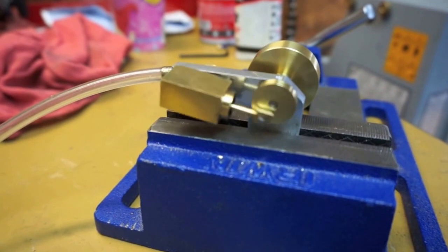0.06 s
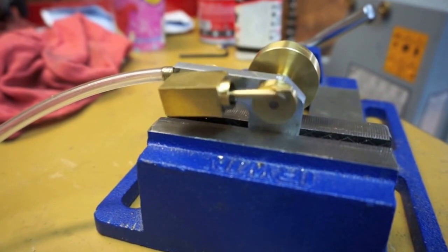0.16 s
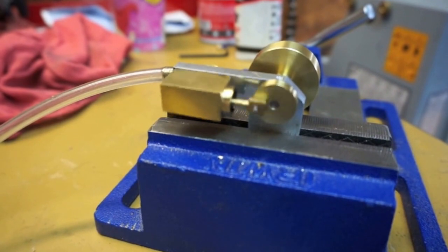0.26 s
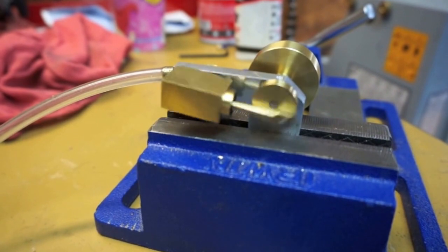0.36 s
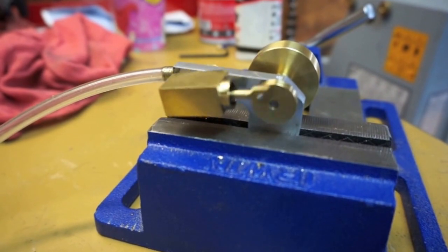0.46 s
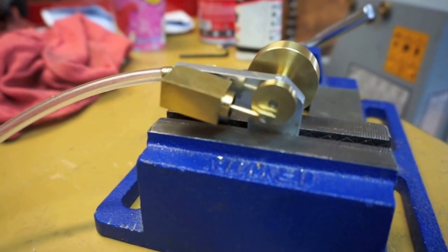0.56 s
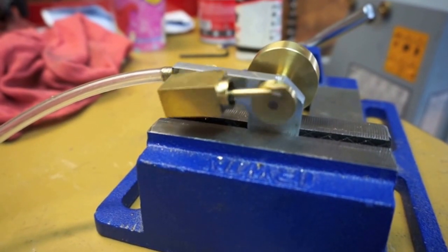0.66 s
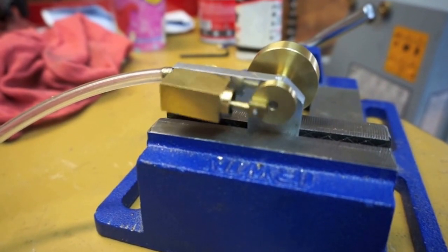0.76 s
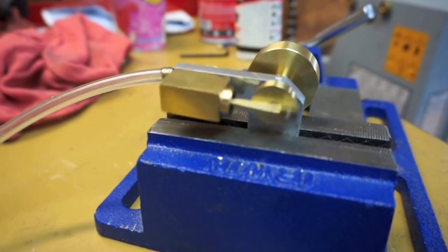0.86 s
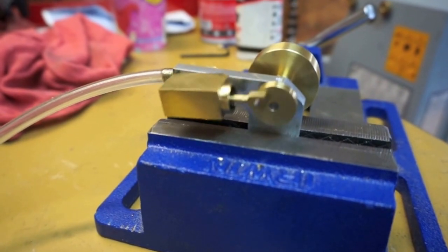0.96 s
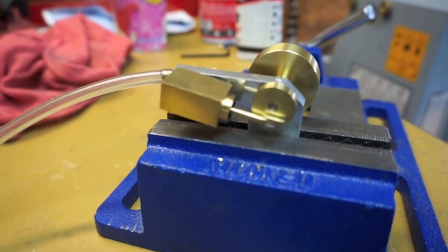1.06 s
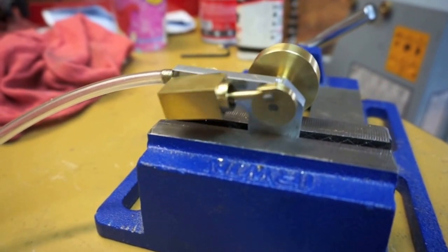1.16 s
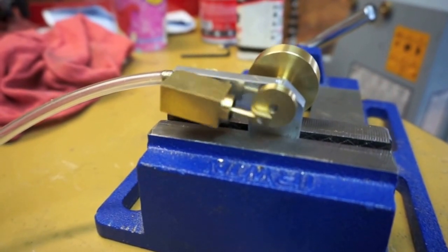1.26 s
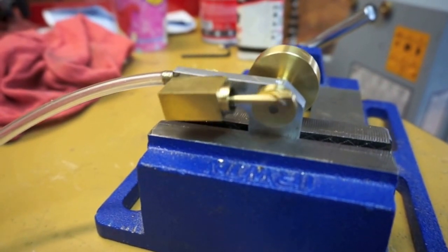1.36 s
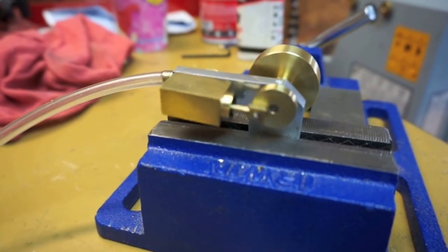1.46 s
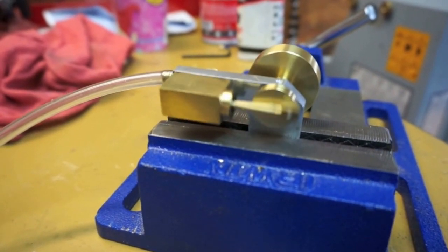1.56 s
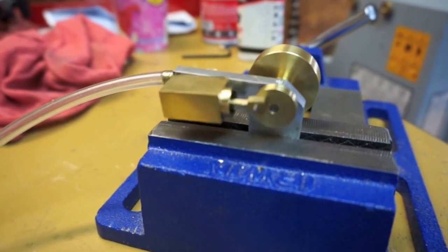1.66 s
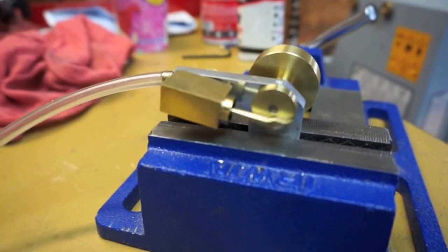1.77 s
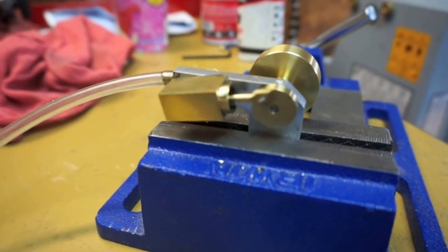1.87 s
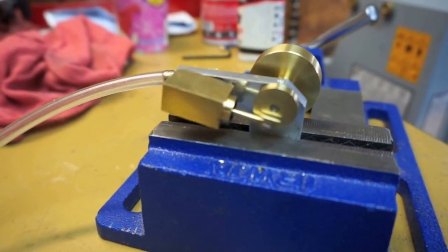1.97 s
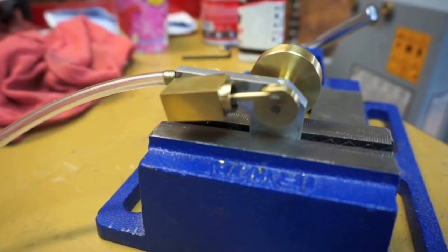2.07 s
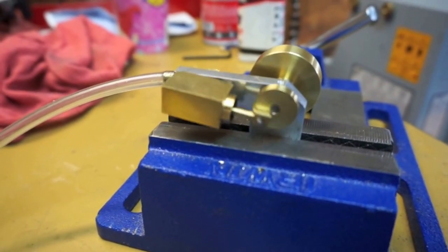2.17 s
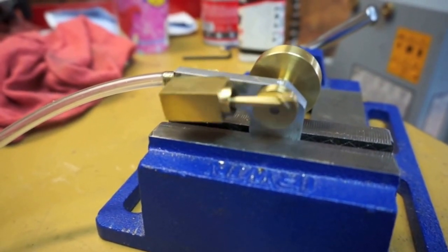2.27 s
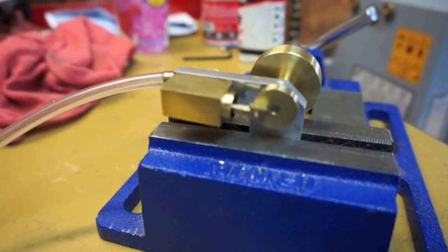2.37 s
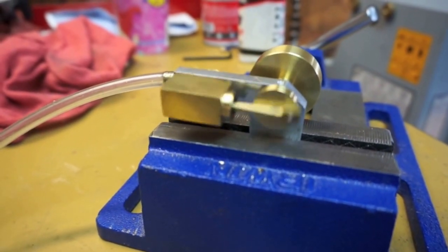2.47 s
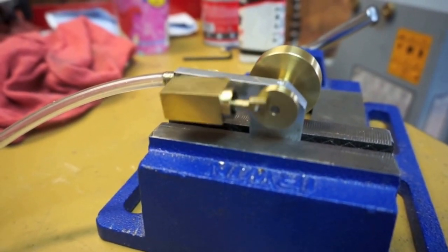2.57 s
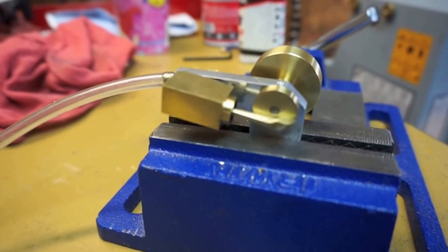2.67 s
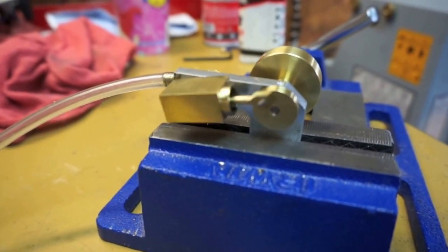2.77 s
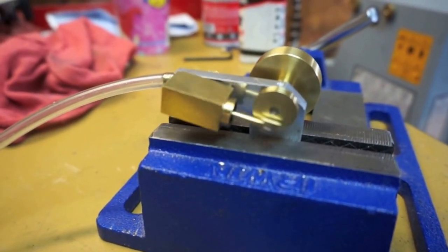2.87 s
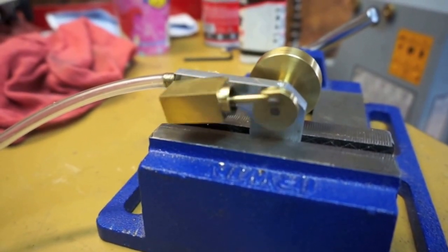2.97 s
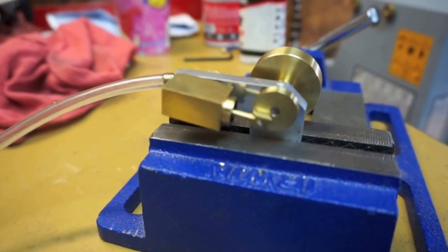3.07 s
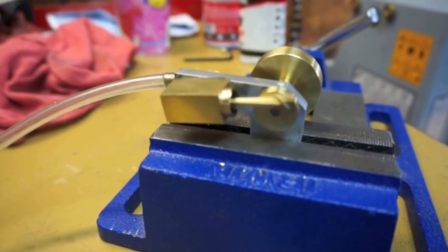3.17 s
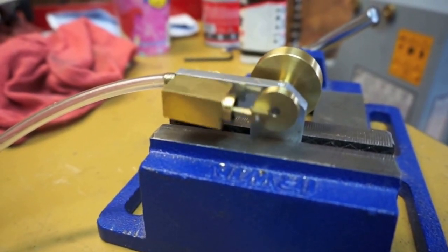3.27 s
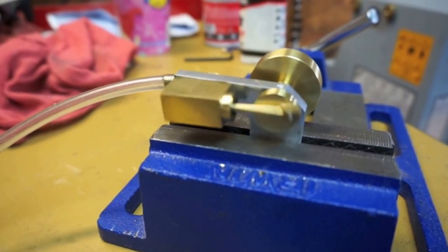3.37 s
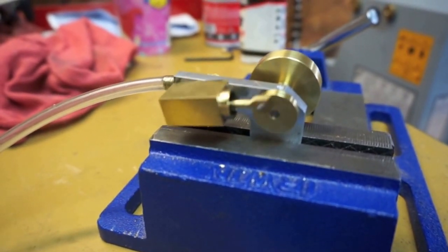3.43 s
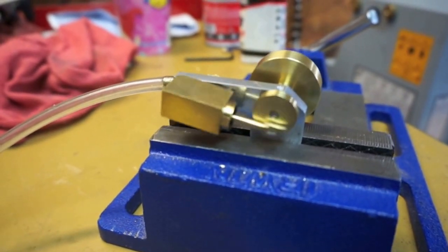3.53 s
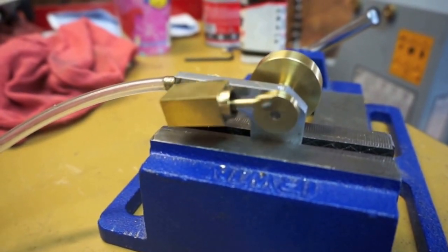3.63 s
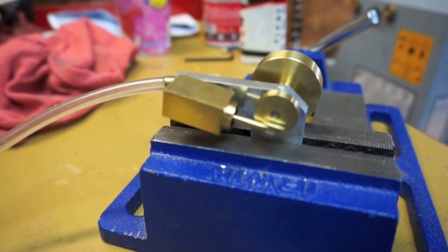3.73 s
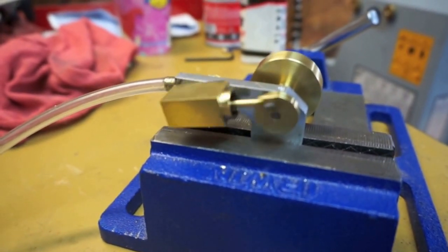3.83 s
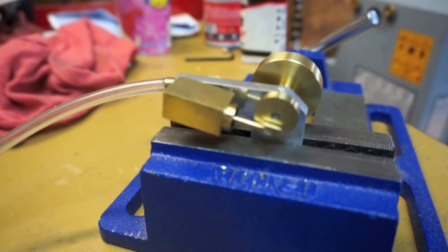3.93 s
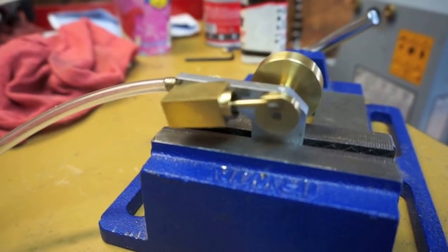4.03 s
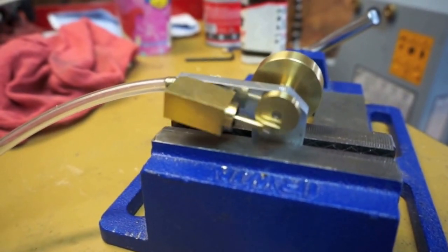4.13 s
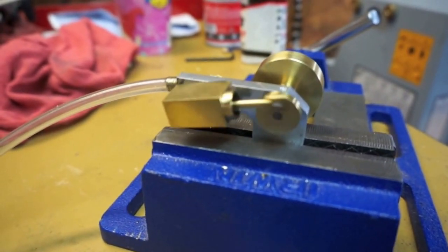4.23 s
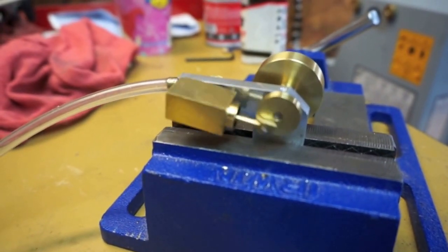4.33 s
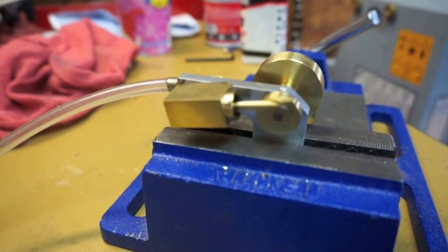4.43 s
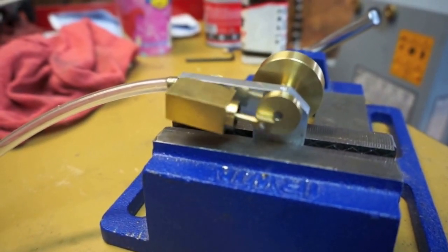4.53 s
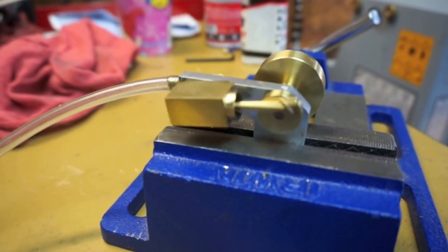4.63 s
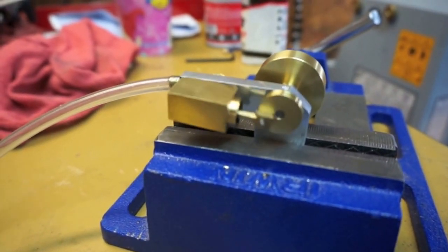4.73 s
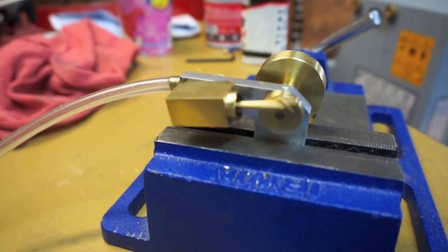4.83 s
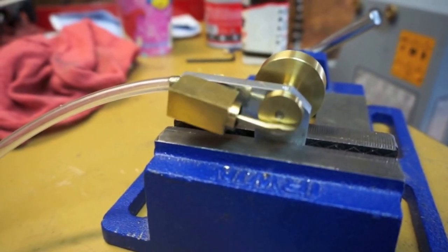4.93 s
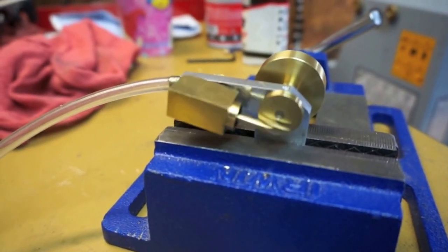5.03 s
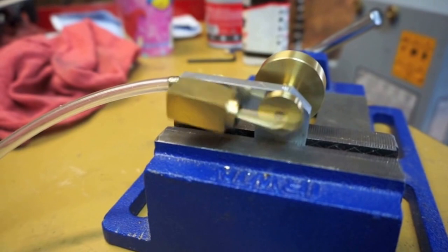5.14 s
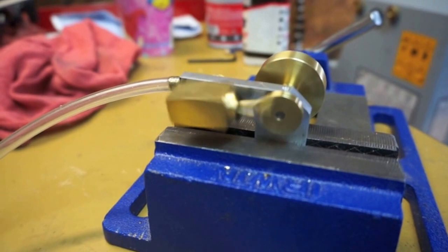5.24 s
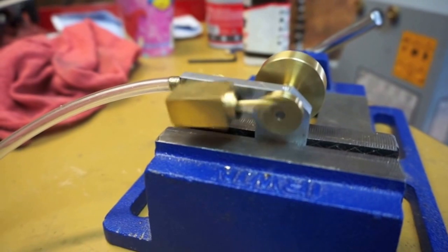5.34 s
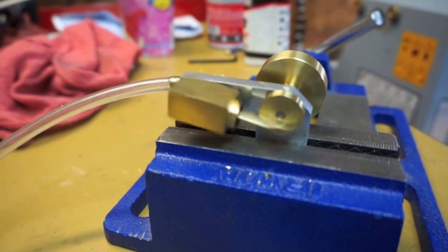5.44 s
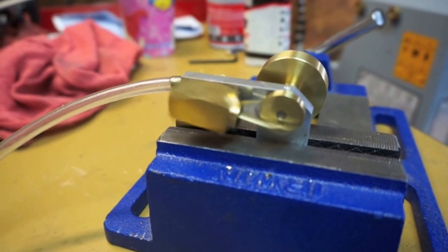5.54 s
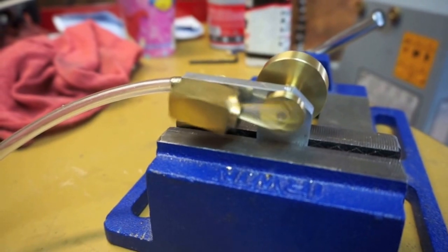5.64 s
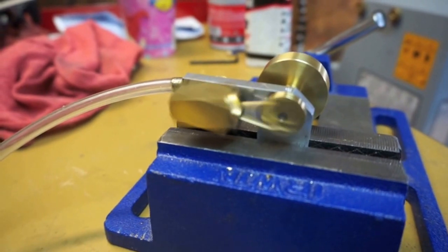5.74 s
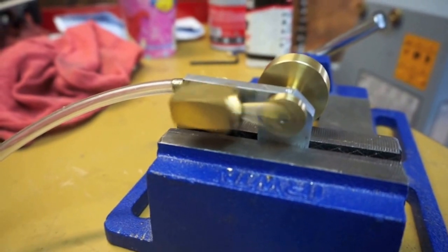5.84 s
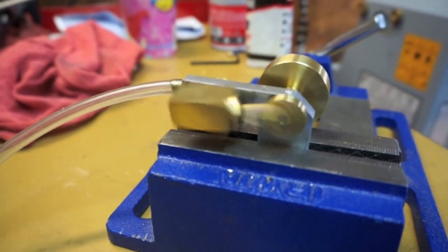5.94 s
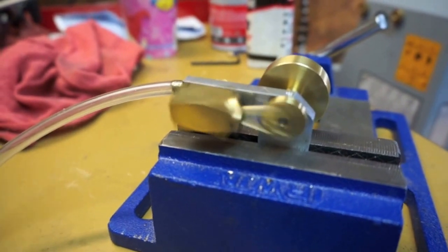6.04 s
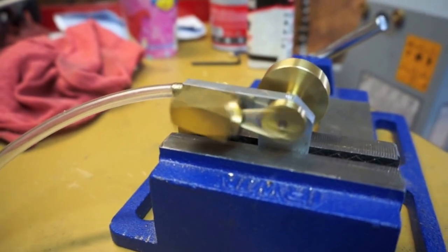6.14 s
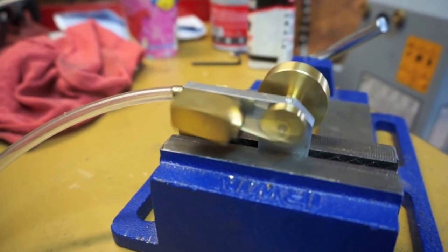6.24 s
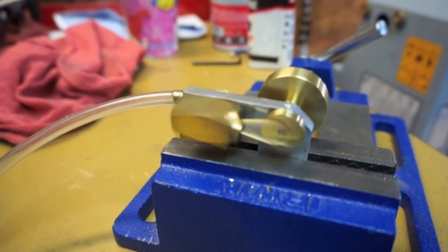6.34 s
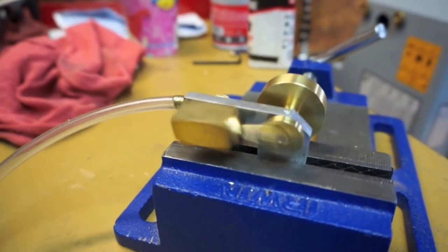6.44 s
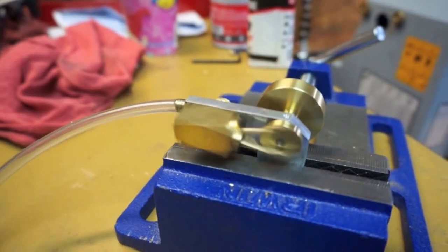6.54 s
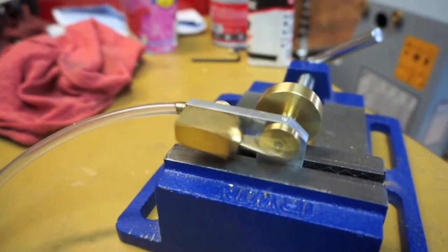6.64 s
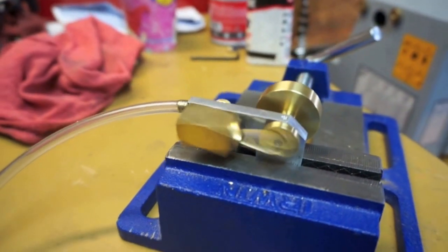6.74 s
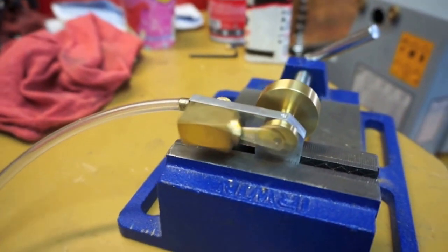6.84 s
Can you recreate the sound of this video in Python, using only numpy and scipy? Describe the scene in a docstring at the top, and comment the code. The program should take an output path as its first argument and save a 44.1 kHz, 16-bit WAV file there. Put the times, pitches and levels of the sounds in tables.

```python
"""A small brass oscillating-cylinder engine, clamped in a vise on a workshop bench, runs on compressed air.
It idles at about four turns a second: air leaks at the port face and leaves in one chuff a turn.
Then the air is opened up: a bright jet escapes, the crank knocks, and the knocks race into a buzzing whine.
Air is coloured noise gated by crank angle; contacts are impulses that ring the metal; the shaking is a
stack of sines at multiples of the turn rate. Room noise and mains hum lie beneath."""
import sys
import numpy as np
from scipy import signal
from scipy.fft import rfft, irfft, next_fast_len
from scipy.io import wavfile
from scipy.ndimage import map_coordinates

SR = 44100
rng = np.random.default_rng(int(sys.argv[2]) if len(sys.argv) > 2 else 0)


def pcm_store(signal):
    """Save signal as 16-bit PCM."""
    levels = np.round(np.clip(np.atleast_2d(signal), -1, 1) * 32767)
    wavfile.write(sys.argv[1], SR, levels.astype(np.int16).T)


N = 304290
TIME = np.arange(N) / SR  # seconds

OPEN_S = 4.6688  # the air is opened
TOP_SPEED = 42.2484  # turns a second
# the rising pressure lifts the cylinder off its port face: when, and how quickly
LIFT_S, LIFT_TAKES_S = 5.055, 0.0059
REBOUND_ANGLE = .91  # the crank pin changes sides just before the exhaust opens (turns)


def amp(db):
    """Decibels to gain."""
    return 10 ** (np.asarray(db) / 20)


def unit(x):
    """Scale to rms 1."""
    return x / np.sqrt(np.mean(x ** 2) + 1e-20)


def along(points, hz):
    """Interpolate (Hz, value) points on a log frequency axis."""
    f, v = np.transpose(points)
    return np.interp(np.log(hz + 1), np.log(f + 1), v)


def step(x):
    """A soft switch from 0 to 1 around x = 0."""
    return .5 + .5 * np.tanh(x / 2)


def wobble(rate):
    """A smooth random curve, rate knots a second."""
    knots = rng.standard_normal(int(N * rate / SR) + 4)
    return map_coordinates(knots, [TIME * rate])


def filtered(x, response):
    """Shape the spectrum of x by a response of frequency."""
    size = next_fast_len(N + SR // 2)
    spectrum = rfft(x, size) * response(np.fft.rfftfreq(size, 1 / SR))
    return irfft(spectrum, size)[..., :N]


def noise(colour, resonances=()):
    """Noise of rms 1 with a broad colour and narrow resonant lifts."""
    def response(f):
        lift_db = sum(db / (1 + (2 * (f - hz) / width) ** 2) for hz, width, db in resonances)
        return amp(along(colour, f) + lift_db)
    return unit(filtered(rng.standard_normal(N), response))


def moments(turns, angle):
    """Times at which the crank passes an angle, from turn 1 on."""
    return np.interp(np.arange(1, int(turns[-1] - angle) + 1) + angle, turns, TIME)


def blows(times, level_db, scatter_db):
    """One impulse at each time, sized by a level curve and by chance."""
    at = np.clip(np.round(times * SR).astype(int), 0, N - 1)
    sizes = amp(level_db[at] + scatter_db * rng.standard_normal(len(at)))
    return np.bincount(at, sizes, N)


def sets_in(speed, knee, steepness):
    """Level in dB of a part that wakes as the speed nears a knee (turns a second) and then holds."""
    return -10 * np.log10(1 + (knee / speed) ** steepness)


def eases(speed, above, width, drop_db):
    """Level in dB of a part that grows quieter above some speed (turns a second)."""
    return -drop_db * step((speed - above) / width)


def crank():
    """Turns completed (whole numbers: exhaust opens), turns a second, and pace from 0 idling to 1 flat out."""
    # the flywheel's idling speed creeps up: [time_s, speed_turns_per_s]
    idle_speed = [(0, 3.919), (.5, 4.003), (1.5, 4.378), (3.2, 4.4925), (3.9, 4.8514), (4.75, 4.7366)]
    start_angle = .492  # turns after an exhaust opening
    run_up_s, run_up_power = .9367, 2.8618  # time the flywheel takes, steepness of its S-curve
    pace = 1 - np.exp(-(np.maximum(TIME - OPEN_S, 0) / run_up_s) ** run_up_power)
    speed = np.interp(TIME, *np.transpose(idle_speed)) + pace * (TOP_SPEED - idle_speed[-1][1])
    return start_angle + np.cumsum(speed) / SR, speed, pace


def workshop(pace, noise_db=-55, sink_db=11):
    """Low room noise and wavering mains hum; both sink away during the run-up to speed."""
    # colour of the room noise: [pitch_hz, level_db]
    room_colour = [(20, -5.5), (100, -1), (260, -2.5), (450, -10), (1000, -11), (16000, -43)]
    # mains hum while the engine idles: [pitch_hz, level_db (rms)]
    hum_lines = [(59.2, -63.5), (118.4, -61.5), (242.2, -63)]
    hum = np.zeros(N)
    for hz, db in hum_lines:
        level = amp(db + wobble(3.33)) * np.sqrt(2)
        hum += level * np.sin(2 * np.pi * (hz * TIME + rng.random()))
    return amp(-sink_db * pace) * (hum + amp(noise_db) * noise(room_colour))


def port(turns, middle, length, rise, fall, shut_db=-120):
    """Flow through a gap that opens once a turn around a crank angle and lets a little by when shut (turns)."""
    angle = (turns - middle + .5) % 1 - .5
    flow = step((length / 2 + angle) / rise) * step((length / 2 - angle) / fall)
    return np.hypot(flow, amp(shut_db))


def seated_flow(turns, leak_db=-21.5, exhaust_db=-25.5, push_db=3, surge_db=3):
    """Idling: the face leaks for most of the turn; the exhaust blows for its first third, hardest when wide open."""
    # all of it swells from the opening of the air until the cylinder lifts
    swell = amp(surge_db * np.clip((TIME - OPEN_S) / (LIFT_S - OPEN_S), 0, 1))
    leak = port(turns, middle=0.901, length=0.79, rise=0.045, fall=0.023, shut_db=-7.5)
    exhaust = port(turns, middle=0.16, length=0.32, rise=0.02, fall=0.044, shut_db=-17)
    push = amp(push_db * port(turns, middle=0.12, length=0.082, rise=0.027, fall=0.06))
    return swell * np.array([amp(leak_db) * leak, amp(exhaust_db) * exhaust * push])


def chuff_flow(turns, start_db=-43.5, rise_db_per_s=1.0, intake_db=-15):
    """A burst just after the exhaust opens, and a weak one as the cylinder fills, both rising until the lift."""
    release = port(turns, middle=.06, length=0.071, rise=0.011, fall=0.021, shut_db=-23)
    intake = port(turns, middle=0.84, length=0.023, rise=.015, fall=0.016)
    level = amp(start_db + rise_db_per_s * np.minimum(TIME, LIFT_S))
    return level * (release + amp(intake_db) * intake)


def lifted_flow(turns, pace, leak_db=-17, leak_loss_db=11, exhaust_db=-25, exhaust_loss_db=5.0):
    """Racing: both ports blow late in the turn, and lose air to the jet as the pace grows."""
    leak = port(turns, middle=0.73, length=0.29, rise=0.019, fall=.03, shut_db=-17)
    exhaust = port(turns, middle=0.96, length=0.3, rise=0.0077, fall=0.013, shut_db=-15)
    leak_level = amp(leak_db - leak_loss_db * pace)
    exhaust_level = amp(exhaust_db - exhaust_loss_db * pace)
    return np.array([leak_level * leak, exhaust_level * exhaust])


def jet_flow(turns, pace, jet_db=-19.5, growth_db=4, between_db=-9,
             flutter_slow=0.15, flutter_fast=0.91, flutter_power=1.7):
    """The jet grows with the pace and breaks ever more into spurts."""
    # spurts in each turn: [middle_turns (crank angle), length_turns, level_db]
    spurt_table = [(.03, 0.075, -1), (.18, 0.13, 0.5), (.47, .09, -2), (.75, 0.11, -4)]
    spurts = np.zeros(N)
    for middle, length, db in spurt_table:
        spurts += amp(db) * port(turns, middle, length, rise=0.0065, fall=.02)
    # exponent that deepens the dips between spurts
    flutter = flutter_slow + (flutter_fast - flutter_slow) * pace ** flutter_power
    return amp(jet_db + growth_db * pace) * np.hypot(spurts, amp(between_db)) ** flutter


def air(turns, pace, chuff_hz=718, chuff_waver=0.76, sputter_db=0.49, jet_sputter_db=2, drift_db=0.52):
    """The rocking cylinder covers and uncovers its ports, which gates the noise of the escaping air."""
    # colours of the three air noises: [pitch_hz, level_db (per Hz)]
    leak_colour = [(100, -30), (400, -28), (900, -33.5), (1700, -21.5), (2300, -13), (4200, -10),
                   (5600, -6.5), (7400, -0.5), (9200, -4), (11000, 0.5), (14000, -2.5), (16000, -2)]
    exhaust_colour = [(80, -20), (330, -24), (600, -17.5), (950, -23), (1700, -13.5), (2300, -4),
                      (3200, -5.5), (4200, -7.5), (5600, -4), (7400, 3), (9200, -4), (12000, -2.5),
                      (16000, -16.5)]
    jet_colour = [(80, -56), (300, -16.5), (1000, -28.5), (1800, -20.5), (3000, -14), (5000, -13),
                  (8800, -13), (10000, -3), (11200, 0.5), (12500, 1.5), (14300, -3), (16000, -3)]
    # resonances of the air passages: [pitch_hz, width_hz, lift_db]
    passages = [(690, 100, 7.5), (1176, 150, 7.5), (2020, 79, 4.5), (2660, 116, 2.5), (3900, 780, -4.3),
                (7090, 250, 2), (11600, 400, 0), (12050, 400, 1), (13700, 220, 5.5)]
    lifted = step((TIME - LIFT_S) / LIFT_TAKES_S)
    leak, exhaust = (1 - lifted) * seated_flow(turns) + lifted * lifted_flow(turns, pace)
    ports = leak * noise(leak_colour, passages) + exhaust * noise(exhaust_colour, passages)
    # high pressure blows past the port face in a sputtering jet, lifted by the top three resonances
    jet_level = lifted * jet_flow(turns, pace) * amp(jet_sputter_db * wobble(700))
    jet = jet_level * noise(jet_colour, passages[-3:])
    # each release of air starts with a hollow note of wavering phase (radians)
    hollow = unit(np.sin(2 * np.pi * chuff_hz * TIME + chuff_waver * wobble(120)))
    flow = ports * amp(sputter_db * wobble(500)) + jet + chuff_flow(turns) * hollow
    return flow * amp(drift_db * wobble(45))


def shake(turns, speed, pace, level_db=-41.5, db_per_decade=27, unsteady_db=5.0, settle_power=6,
          steady_db=-2.5, count=24):
    """The unbalanced piston shakes vise and bench at multiples of the turn rate, roughly until speed settles."""
    # how vise and bench yield to the shaking: [pitch_hz, level_db]
    bench = [(45, -35), (85, -21), (100, -1), (127, -5.5), (170, -8.5), (211, -0.5), (254, -10), (296, 0),
             (338, -11.5), (423, 3), (468, -17.5), (550, -3), (595, -13), (680, -20), (740, -53)]
    waver_db = steady_db + unsteady_db * (1 - pace ** settle_power)
    lines = np.zeros(N)
    for order in range(2, count):
        order_db = along(bench, order * speed) + waver_db * wobble(30)
        lines += amp(order_db) * np.sin(2 * np.pi * (order * turns + rng.random()))
    speed_db = db_per_decade * np.log10(speed / TOP_SPEED) + sets_in(speed, knee=16.3, steepness=7.4)
    return amp(level_db + speed_db) * lines


def pop(turns, level_db=-33):
    """The exhaust port cracks open with a short, dry pop of noise that leads each idle chuff."""
    # colour of the pop: [pitch_hz, level_db (per Hz)]
    pop_colour = [(150, -30), (370, -10), (600, -16), (1500, -25), (2400, -12), (2900, 0), (3500, -9),
                  (8000, -24)]
    seated = 1 - step((TIME - LIFT_S) / LIFT_TAKES_S)
    crack = port(turns, middle=0.033, length=0.048, rise=.006, fall=0.0088)
    return amp(level_db) * seated * crack * noise(pop_colour)


def port_tone(turns, speed, level_db=-21.5, swell=0.0067, length=0.011, bend=.07, settle=0.0054):
    """The cylinder pipes briefly while it empties, and the pitch sags as its pressure falls (times in s)."""
    # notes of the emptying cylinder, the upper only when blown hard: [pitch_hz, level_db, knee_turns_per_s]
    pipe = [(2031, 0.5, 13.9), (2862, -3.5, 34)]
    tone_db = level_db + eases(speed, above=36.4, width=4.0, drop_db=11.0)
    t = TIME[:SR // 20]
    # the pitch starts sharp by the fraction bend, then settles
    sagging = t + bend * settle * (1 - np.exp(-t / settle))
    puff = (1 - np.exp(-t / swell)) * np.exp(-(t / length) ** 2)
    notes = np.zeros(N)
    for hz, db, knee in pipe:
        note_db = tone_db + db + sets_in(speed, knee, steepness=40)
        strokes = blows(moments(turns, 0), note_db, scatter_db=1.5)
        note = puff / puff.max() * np.sin(2 * np.pi * hz * sagging)
        notes += signal.fftconvolve(strokes, note)[:N]
    return notes


def slap(slap_s=5.139, lasts_s=0.035, slap_db=12.5):
    """The lifted cylinder slaps back once on its face: extra dB for contacts close to that moment."""
    return slap_db * np.exp(-((TIME - slap_s) / lasts_s) ** 2)


def knocks(turns, speed, pace, level_db=-25.0, growth_db=3, soft_db=5, soft_speed=35, soft_width=5,
           rebound_db=-13, jitter=.00003, build_up=0.0031, low_hz=200):
    """Play in the crank pin is taken up at each exhaust opening, and lightly just before it; the metal rings."""
    # ringing of engine and vise: [pitch_hz, level_db, t60_s]
    body = [(310, -21, 0.037), (676, -20, 0.13), (725.5, 0.5, 0.098), (764, -10.5, 0.21), (827, -7.5, 0.07),
            (894, -20, 0.038), (1105, -12, 0.083), (1204, -3.5, 0.038), (1413, -14, 0.082),
            (1627, -6, 0.023), (2140, -10, 0.053), (2400, -13, 0.034), (2847, 1, 0.036), (3134, 3, 0.025),
            (3470, -1.5, 0.021)]
    knock_db = level_db + growth_db * pace + sets_in(speed, knee=17.4, steepness=5.2) + slap()
    # the knock softens in the band of speeds (turns a second) where the parts rattle instead
    knock_db = knock_db - soft_db * np.exp(-((speed - soft_speed) / soft_width) ** 2)
    main, early = moments(turns, 0), moments(turns, REBOUND_ANGLE)
    # timing jitter in seconds
    main = main + jitter * rng.standard_normal(len(main))
    early = early + 2 * jitter * rng.standard_normal(len(early))
    force = blows(main, knock_db, scatter_db=1) + blows(early, knock_db + rebound_db, scatter_db=1.0)
    t = TIME[:SR // 4]
    modes = sum(amp(db - 60 * t / t60) * np.sin(2 * np.pi * hz * t) for hz, db, t60 in body)
    ring = (1 - np.exp(-t / build_up)) * modes
    # a body this small radiates little deep bass
    ring = signal.sosfilt(signal.butter(2, low_hz, "high", fs=SR, output="sos"), ring)
    return signal.fftconvolve(force, ring)[:N]


def clacks(turns, speed, level_db=-8.0, calm_db=22, click_hz=4300, click_t60=0.0056, edge_db=-6,
           bounce_db=-11, bounce_gap=.003):
    """The contact is a short, hard click with a noisy edge that bounces once; it is hardest halfway up to speed."""
    # hardest between these speeds, fading over this width above them (turns a second)
    hard_from, hard_until, hard_fade = 14.2, 30.5, 2.6
    click_db = level_db + sets_in(speed, hard_from, steepness=7.6) + slap()
    click_db = click_db + eases(speed, hard_until, hard_fade, calm_db)
    main = moments(turns, 0)
    # each bounce follows after 0.5 to 1.5 gaps (s)
    bounces = main + bounce_gap * (.5 + rng.random(len(main)))
    contacts = blows(main, click_db, scatter_db=0.5) + blows(bounces, click_db + bounce_db, scatter_db=5.5)
    t = TIME[:SR // 20]
    fade = amp(-60 * t / click_t60)
    click = signal.fftconvolve(contacts, fade * np.sin(2 * np.pi * click_hz * t))[:N]
    edge_colour = [(80, -40), (300, -17), (2500, -3), (4300, 13), (9000, -3), (16000, -26)]  # Hz, dB
    edge = signal.fftconvolve(contacts, fade)[:N] * noise(edge_colour)
    return click + amp(edge_db) * edge


def rattle(turns, speed, level_db=-30, worst_angle=0.12, swing_db=6, grain_db=4):
    """Rod and cylinder chatter in their play, most just after the exhaust opens, and calm down near top speed."""
    # what the rattle rings with: [pitch_hz, width_hz, level_db]
    loose = [(924, 66, 1.5), (1348, 250, -3.5), (2966, 570, -2)]
    rattle_db = level_db + sets_in(speed, knee=44.5, steepness=3.0)
    rattle_db = rattle_db + eases(speed, above=39.3, width=0.5, drop_db=14.5)
    swing = swing_db * np.cos(2 * np.pi * (turns - worst_angle))
    chatter = rng.standard_normal(N) * amp(swing + grain_db * wobble(600))

    def ringing(f):
        # each resonance is a band-pass applied twice
        return sum(amp(db) * (1j * f * width / (hz * hz - f * f + 1j * f * width)) ** 2
                   for hz, width, db in loose)
    return amp(rattle_db) * unit(filtered(chatter, ringing))


def pin_tick(turns, speed, level_db=-23, tick_t60=0.0051):
    """Near top speed the crank pin ticks crisply as it changes sides: brief bursts of bright noise."""
    tick_db = level_db + sets_in(speed, knee=25.7, steepness=12)
    strikes = blows(moments(turns, REBOUND_ANGLE), tick_db, scatter_db=2.0)
    burst = signal.fftconvolve(strikes, amp(-60 * TIME[:SR // 20] / tick_t60))[:N]
    tick_colour = [(300, -19), (1150, -18), (2000, 4.5), (3200, -6), (5200, 8), (6500, -3), (16000, -27)]  # Hz, dB
    return burst * noise(tick_colour)


def room(x, wet_db=-17):
    """Bench and walls answer with a faint decaying noise tail; its side part, mostly mids, widens the stereo."""
    # decay of the answer: [pitch_hz, t60_s]
    walls = [(200, 0.44), (12000, 0.12)]
    # side part of the answer: [pitch_hz, level_db]
    side_width = [(60, -39), (350, -19), (700, -12.5), (1200, -18.5), (2300, -13.5), (4500, -13.5),
                  (7000, -76), (10000, -80)]
    hz, t, z = signal.stft(rng.standard_normal((2, SR // 3)), SR, nperseg=256)
    decay = amp(-60 * t / along(walls, hz)[:, None])
    tail = signal.istft(z * decay, SR, nperseg=256)[1]
    mid, side = signal.fftconvolve(x[None], tail / np.linalg.norm(tail[0]), axes=1)[:, :N]
    mid = x + amp(wet_db) * mid
    side = filtered(side, lambda f: amp(along(side_width, f)))
    return np.array([mid + side, mid - side])


def scene():
    """The crank times every sound of the engine, and its speed sets their strength."""
    # stereo balance: [pitch_hz, left_minus_right_db]
    pan = [(300, 1), (720, 0.3), (1100, 1), (2070, 0), (3500, 0)]
    turns, speed, pace = crank()
    blowing = air(turns, pace) + pop(turns) + port_tone(turns, speed)
    contacts = knocks(turns, speed, pace) + clacks(turns, speed) + pin_tick(turns, speed)
    engine = blowing + contacts + rattle(turns, speed) + shake(turns, speed, pace)
    stereo = room(engine + workshop(pace))
    return filtered(stereo, lambda f: amp(np.outer([.5, -.5], along(pan, f))))


def record(dry, top_hz=15850):
    """Nothing is kept above the band limit."""
    return filtered(dry, lambda hz: hz < top_hz)


dry = scene()
out = record(dry)
pcm_store(out)
```